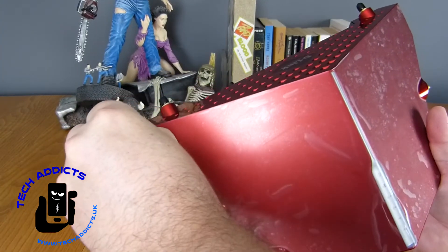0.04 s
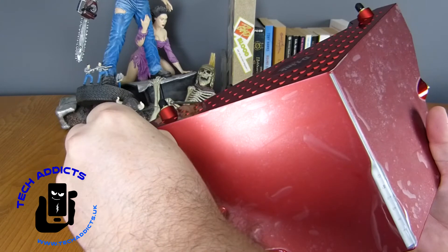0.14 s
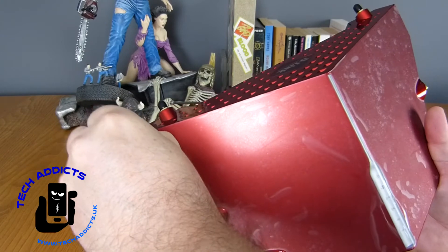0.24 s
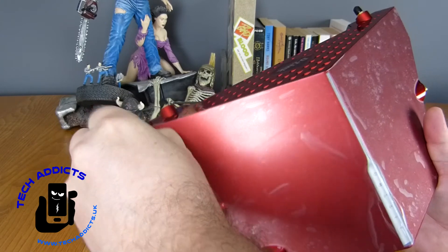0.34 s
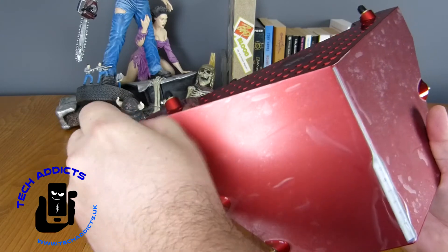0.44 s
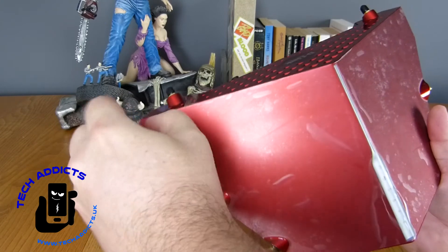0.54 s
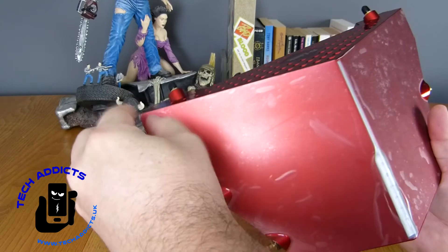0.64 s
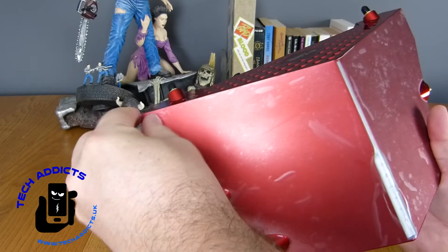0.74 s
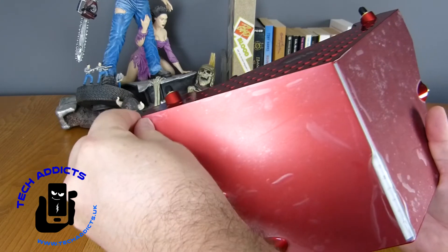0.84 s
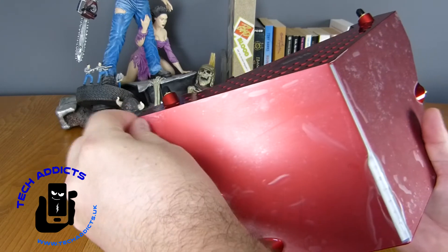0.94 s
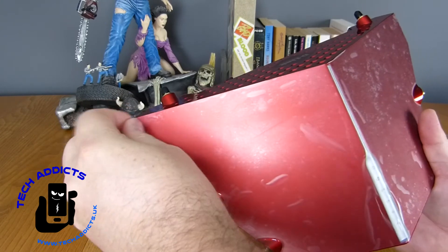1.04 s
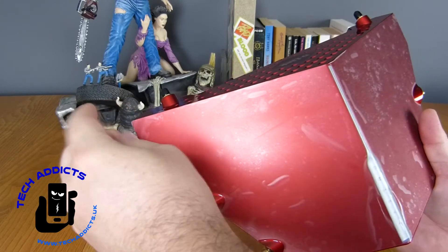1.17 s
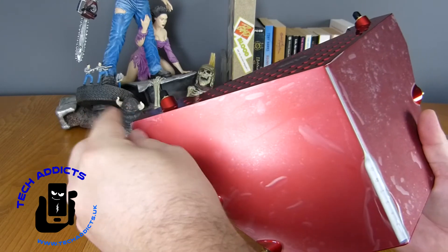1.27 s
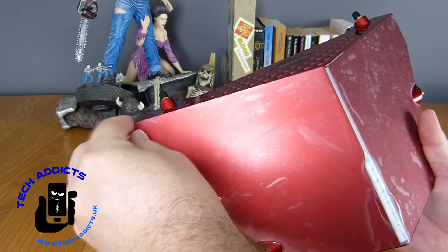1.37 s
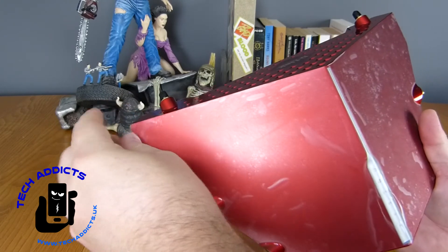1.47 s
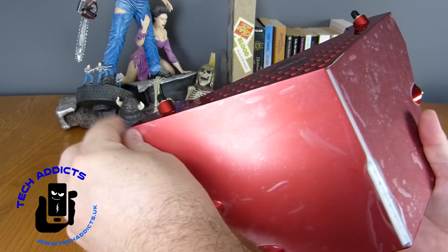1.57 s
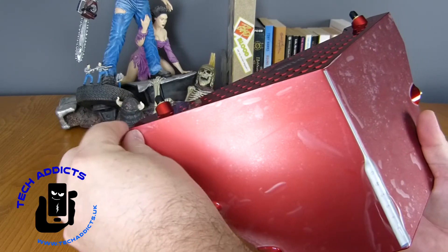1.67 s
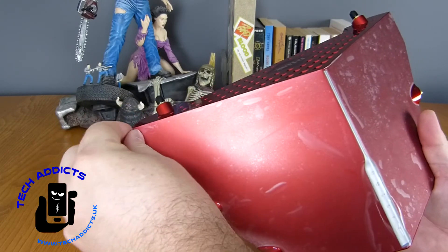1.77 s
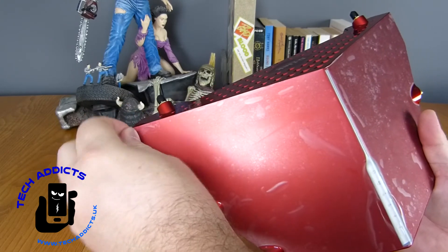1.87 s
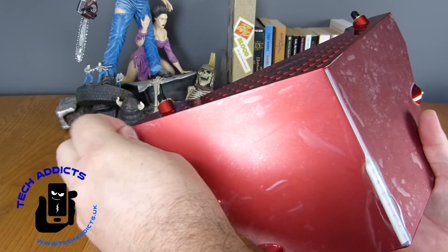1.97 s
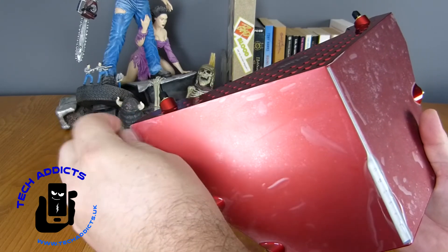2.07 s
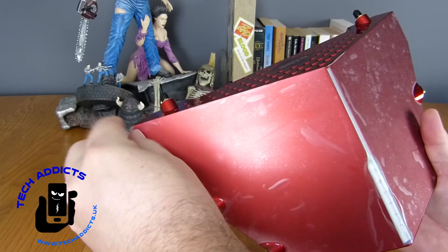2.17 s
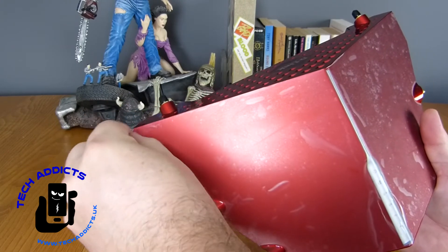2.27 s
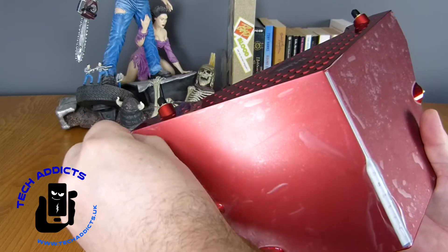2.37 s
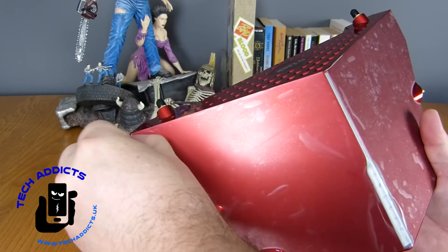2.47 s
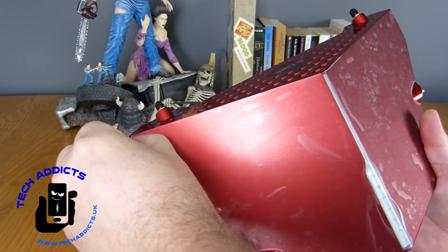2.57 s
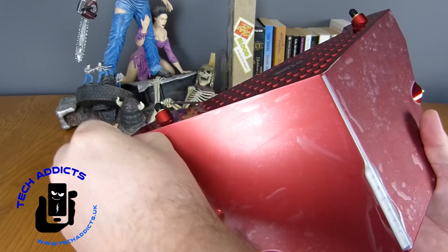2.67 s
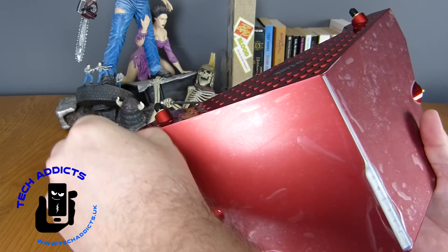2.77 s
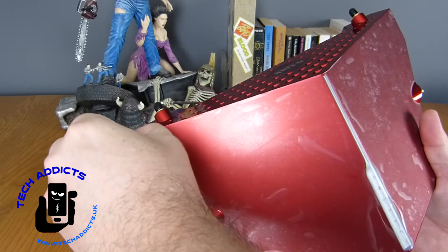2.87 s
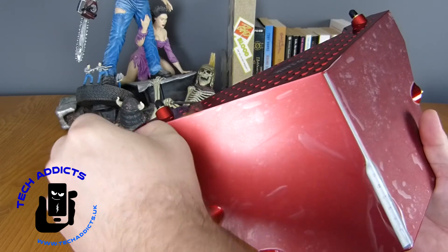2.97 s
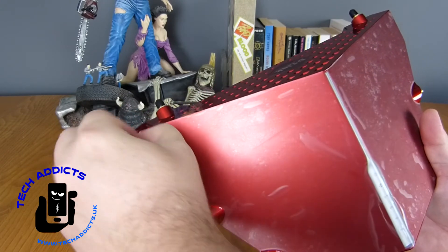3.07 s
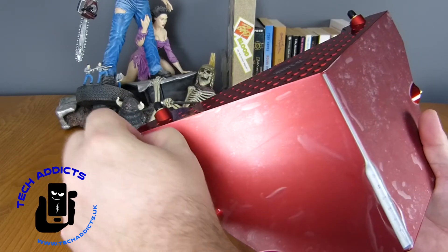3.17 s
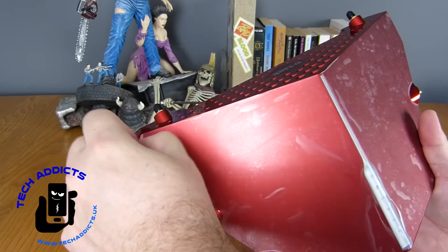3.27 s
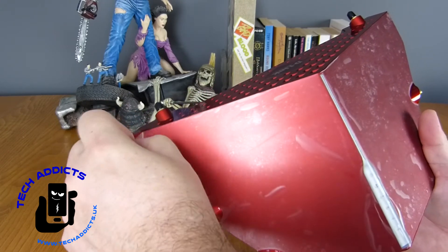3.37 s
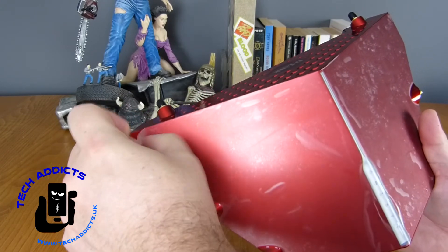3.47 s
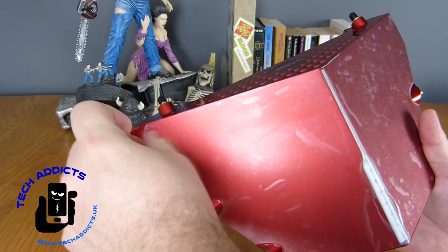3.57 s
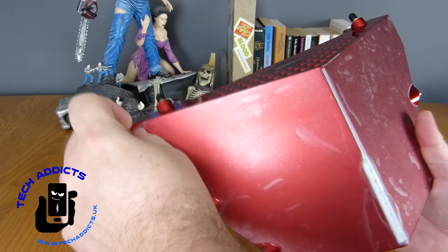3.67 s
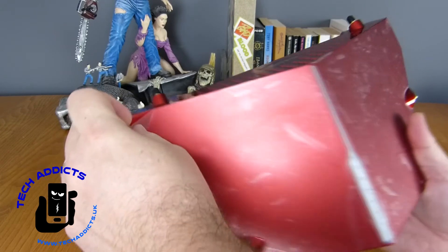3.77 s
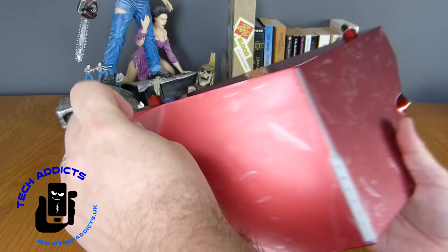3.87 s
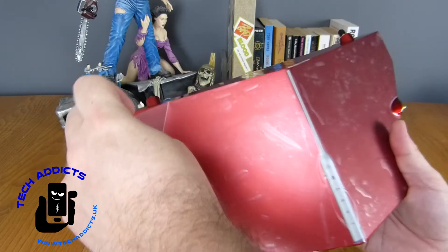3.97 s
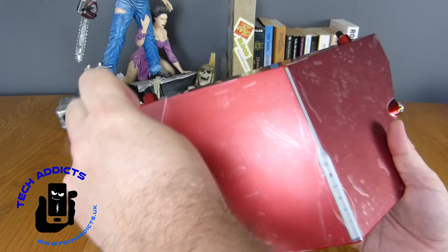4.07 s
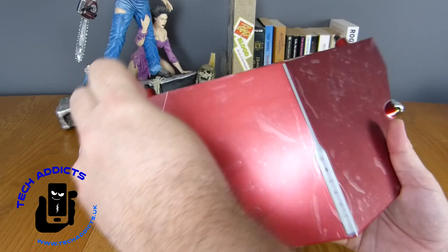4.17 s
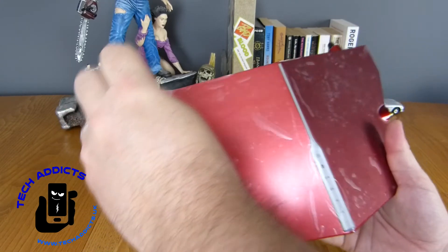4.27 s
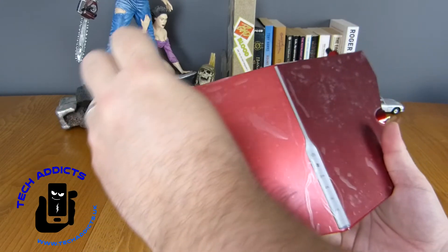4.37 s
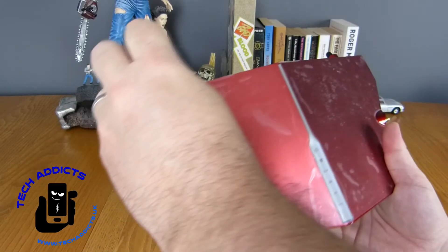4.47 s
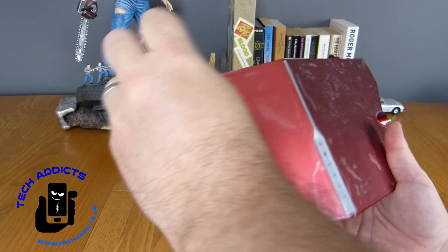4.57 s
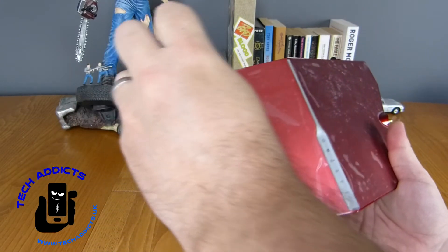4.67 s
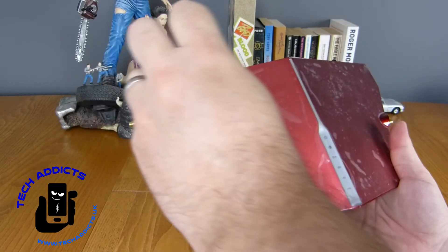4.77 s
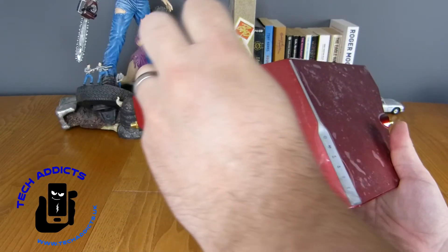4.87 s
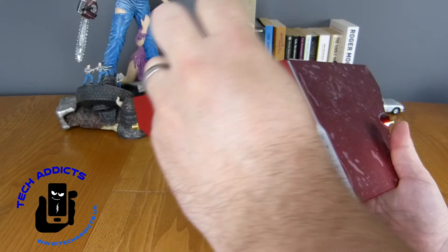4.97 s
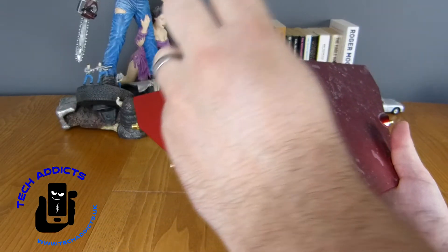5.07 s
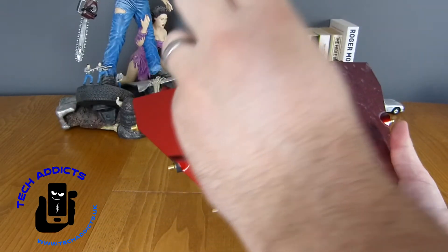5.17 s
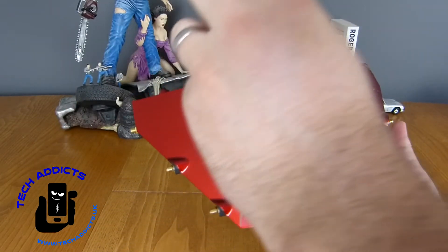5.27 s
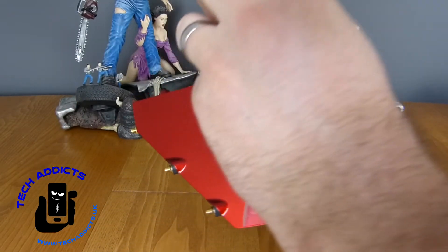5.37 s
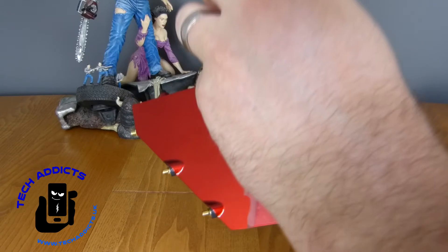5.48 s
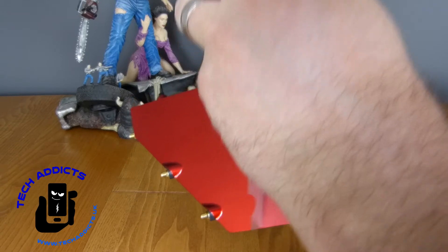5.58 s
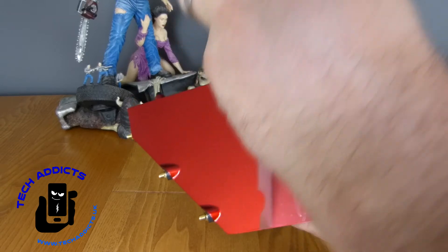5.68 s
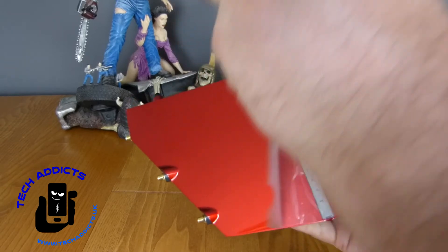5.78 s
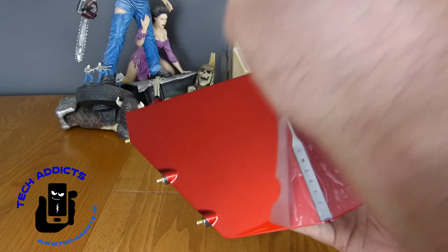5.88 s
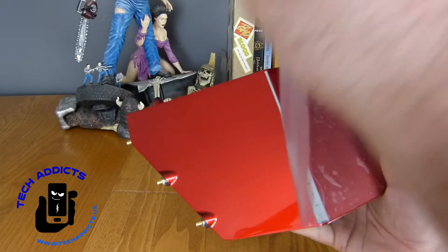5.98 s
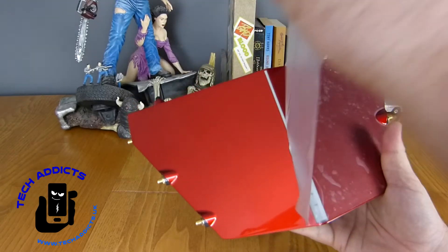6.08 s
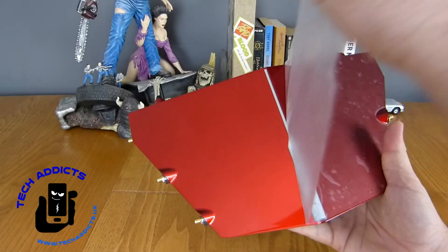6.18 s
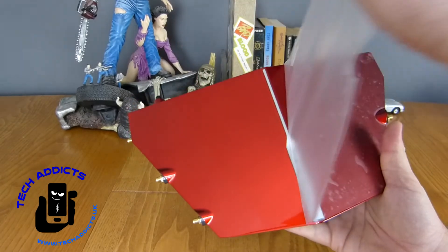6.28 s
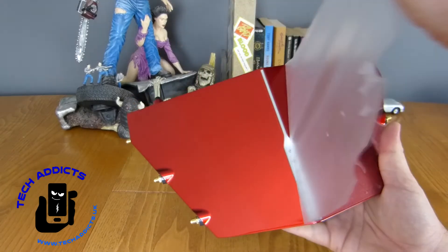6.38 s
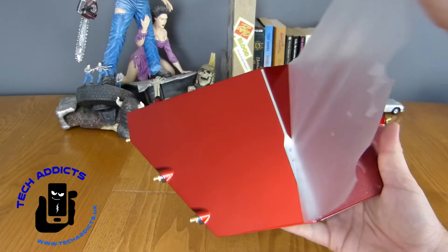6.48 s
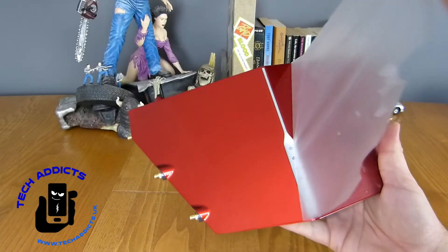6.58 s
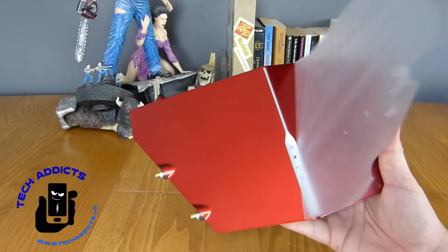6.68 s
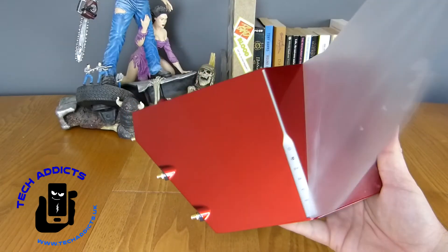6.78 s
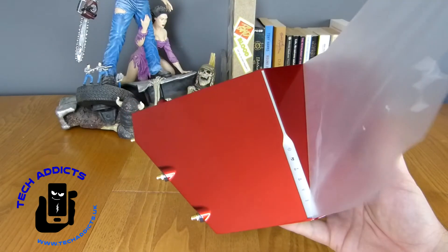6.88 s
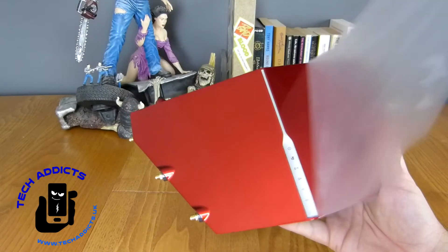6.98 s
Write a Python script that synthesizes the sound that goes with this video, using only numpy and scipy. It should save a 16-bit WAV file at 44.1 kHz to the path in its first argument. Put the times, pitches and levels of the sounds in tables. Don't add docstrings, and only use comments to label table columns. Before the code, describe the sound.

Quiet room hiss with sparse ticks and small film crackles, followed by a bright burst of jerky adhesive tearing from a resonant plastic box.

```python
import sys
import numpy as np
from scipy import signal
from scipy.fft import rfft, irfft, next_fast_len
from scipy.io import wavfile
from scipy.ndimage import uniform_filter1d, map_coordinates

SR = 44100
rng = np.random.default_rng(int(sys.argv[2]) if len(sys.argv) > 2 else 0)


def attenuation_scalar(level_db):
    decades = np.asarray(level_db, float) / 20
    return 10 ** decades


def unload_audio(sound):
    columns = np.transpose(np.atleast_2d(sound))
    steps = np.round(np.clip(columns, -1, 1) * 32767)
    wavfile.write(sys.argv[1], SR, steps.astype(np.int16))


N = 309840


def unit(x):
    return x / np.sqrt(np.mean(x ** 2) + 1e-20)


def along(points, hz):
    f, v = np.transpose(points)
    return np.interp(np.log(hz + 1), np.log(f + 1), v)


def hump(hz, centre_hz, width):
    return 1 / (1 + (np.log((hz + 1) / centre_hz) / width) ** 2)


def wobble(rate_hz):
    knots = rng.standard_normal(int(N * rate_hz / SR) + 4)
    return map_coordinates(knots, [np.arange(N) * rate_hz / SR])


def filtered(x, response):
    m = next_fast_len(x.shape[-1] + SR // 8)
    spectrum = rfft(x, m) * response(np.fft.rfftfreq(m, 1 / SR))
    return irfft(spectrum, m)[..., :x.shape[-1]]


def bent(x, gain_db, patchy_db):
    hz, t, z = signal.stft(x, SR, nperseg=512, noverlap=384)
    field = uniform_filter1d(rng.standard_normal(z.shape), size=2, axis=0)
    field = uniform_filter1d(field, size=50, axis=1)
    shape_db = gain_db(hz[:, None], np.minimum((t * SR).astype(int), N - 1))
    z = z * attenuation_scalar(shape_db + patchy_db * unit(field))
    return signal.istft(z, SR, nperseg=512, noverlap=384)[1][:N]


# freq_hz, level_db_per_hz
HISS = [(20, -30), (45, -3.5), (120, -5.5), (170, -5.5), (370, -10), (450, -12), (490, -11), (650, -15),
        (700, -14), (3000, -25.5), (9000, -32), (14500, -33), (16000, -48)]
# freq_hz, side_minus_mid_db
HISS_SIDE = [(60, -35), (110, -28), (200, -28), (380, -24), (700, -20.5), (1290, -18), (2380, -13.5),
             (4400, -11), (8120, -9.5), (15000, -12)]


def hiss():
    level_db = -57.5 + 0.39 * wobble(3.13)
    mid = filtered(rng.standard_normal(N), lambda hz: attenuation_scalar(along(HISS, hz)))
    side = filtered(rng.standard_normal(N), lambda hz: attenuation_scalar(along(HISS, hz) + along(HISS_SIDE, hz)))
    return attenuation_scalar(level_db) * np.array([mid + side, mid - side]) / np.std(mid)


def flutter(x):
    hz, t, z = signal.stft(x, SR, nperseg=1024)
    strips = rng.random((len(hz) // 6 + 1, len(t) // 2 + 1))
    strips = np.repeat(np.repeat(strips, 6, axis=0), 2, axis=1)
    lost = np.clip((hz[:, None] - 12300) / 4600, 0, .8)
    keep = strips[:len(hz), :len(t)] > lost
    return signal.istft(z * keep / np.sqrt(1 - lost), SR, nperseg=1024)[1][..., :N]


def shake():
    level_db = -65 + 4.5 * np.tanh(wobble(3.5))
    return attenuation_scalar(level_db) * unit(filtered(rng.standard_normal(N), lambda hz: hump(hz, 25.4, .3) ** 2))


def ruptures(spread_db, clump_db):
    size_db = spread_db * rng.uniform(-1.24, 1, N) + clump_db * np.tanh(wobble(110) + wobble(500))
    return unit(rng.standard_normal(N) * attenuation_scalar(size_db))


def curves(tables):
    s, *cols = np.transpose(np.vstack(tables))
    t = np.arange(N) / SR
    on = sum((t >= rows[0][0]) & (t < rows[-1][0]) for rows in tables) > 0
    level_db, *rest = [np.interp(t, s, c) for c in cols]
    return [attenuation_scalar(level_db) * uniform_filter1d(on * 1., size=90), *rest]


# time_s, tearing_db, flap_hz
LIFTS = [
    [(.42, -70, 3700), (.428, -44, 3620), (.445, -40.5, 3100), (.47, -38.5, 2140), (.495, -41.5, 1500),
     (.53, -42.5, 1220), (.549, -33.5, 1400), (.565, -46, 1450), (.6, -57, 2200)],
    [(1.066, -70, 6500), (1.074, -56, 6000), (1.086, -50, 2400), (1.1, -52, 1900), (1.125, -69, 2200)],
    [(3.002, -62, 5500), (3.018, -42, 4300), (3.04, -42, 3180), (3.06, -45, 2800), (3.076, -52, 2600),
     (3.095, -41.5, 2290), (3.11, -41, 1810), (3.13, -46, 1830), (3.145, -59, 1840)],
]
# freq_hz, level_db_per_hz
FILM = [(400, -45), (700, -29), (1200, -9), (2250, -8), (3300, -1.5), (4500, 1), (5800, -0.5), (9000, -3.5),
        (12700, -3.5), (14500, -4), (15800, -9)]
# freq_hz, level_db_per_hz
DRUM = [(250, -31), (500, -6), (800, 0.5), (1200, 1.5), (2000, 0.5), (2600, -4.5), (3400, -11.5),
        (5700, -120)]


def lifts():
    short_flap_hz, upper_mode_hz, upper_follows = 4500, 6400, .15
    gain, flap_hz = curves(LIFTS)
    longer_oct = np.maximum(np.log2(short_flap_hz / flap_hz), 0)
    ring_db = 9.5 * longer_oct
    upper_hz = upper_mode_hz * (flap_hz / short_flap_hz) ** upper_follows
    drum_db = -21.5 + 6 * longer_oct
    tilt_db = 5.5 - 2.8 * longer_oct
    busy = round((LIFTS[-1][-1][0] + .1) * SR)
    breaks = ruptures(spread_db=6, clump_db=2.5)[:busy]
    tear, drum = map(unit, filtered(breaks, lambda hz: attenuation_scalar([along(FILM, hz), along(DRUM, hz)])))
    flap_hz = flap_hz * (1 + .035 * wobble(120))

    def flap(hz, at):
        first = 1.3 * ring_db[at] * hump(hz, flap_hz[at], .1)
        second = 4.5 * hump(hz, upper_hz[at], .06)
        below = np.clip(30 * np.log((hz + 1) / flap_hz[at]), -8, 0)
        return first + second + below + tilt_db[at] * np.log2(hz / 6000 + 0.11)

    sound = bent(tear, flap, patchy_db=2.5)[:busy] + attenuation_scalar(drum_db[:busy] + 3.0) * drum
    return gain * attenuation_scalar(-2.0) * np.pad(sound, (0, N - busy))


# time_s, peak_db, centre_hz, knock_db, knock_hz
TICKS = [(0.9703, -36, 4000, -7, 1250), (1.0685, -46, 11000, -25, 1500), (1.569, -53, 3100, -2, 1240),
         (2.011, -50, 4480, -16, 886), (3.2117, -34, 7800, -13, 1320), (3.3053, -36, 8500, -10, 1290),
         (3.5543, -43, 12000, -11, 1730), (3.5612, -37.5, 3400, -6.5, 1580),
         (3.705, -33.5, 3900, -3.5, 1310), (3.7717, -32, 7600, -17, 972), (6.3046, -44.5, 2850, -13, 630),
         (6.754, -31.5, 8300, -23, 1600)]
# time_s, peak_db, centre_hz
JUMPS = [(.4269, -29, 6400), (0.4337, -32, 5700), (.4384, -30, 6360), (3.02, -30, 6500),
         (3.8684, -27, 10100), (3.8836, -19, 11400), (4.3036, -45, 12700), (4.3231, -43, 10000),
         (4.349, -29.5, 6980), (4.37, -24, 6010), (4.3864, -37, 4640), (4.6317, -36, 4452),
         (4.6843, -29, 5170), (4.7623, -14, 4540), (5.1914, -28.5, 6560), (5.6653, -22, 4860),
         (5.7927, -22.5, 11000), (5.92, -21, 6220), (6.0736, -17, 6830), (6.123, -20, 4920),
         (6.398, -46, 11500), (6.4286, -39, 12900), (6.464, -34, 10200), (6.4894, -33, 12500),
         (6.5447, -34.5, 10300), (6.6049, -46, 11300), (6.6245, -36, 7380), (6.8219, -37, 11300),
         (6.8489, -33, 4780), (6.8686, -14, 12500)]


def snaps():
    tick_t60_s, tick_dull_db_per_oct = 0.075, -4
    jump_t60_s, jump_dull_db_per_oct, jump_knock_db, jump_knock_hz = 0.057, -.7, -19.5, 1400
    out, t = np.zeros(N + SR), np.arange(SR // 8) / SR
    hz = np.fft.rfftfreq(len(t), 1 / SR)
    ticks = [(*row, tick_t60_s, tick_dull_db_per_oct) for row in TICKS]
    jumps = [(*row, jump_knock_db, jump_knock_hz, jump_t60_s, jump_dull_db_per_oct) for row in JUMPS]
    for s, db, centre_hz, knock_db, knock_hz, t60_s, dull_db in ticks + jumps:
        burst = rng.standard_normal((2, len(t)))
        dulling_db = dull_db * np.log2(np.maximum(hz / centre_hz, 1))
        bright = attenuation_scalar(along(FILM, hz) + 9.5 * hump(hz, centre_hz, 0.29) + dulling_db)
        snap = unit(irfft(rfft(burst[0]) * bright, len(t)))
        knock = unit(irfft(rfft(burst[1]) * hump(hz, knock_hz, 0.33), len(t)))
        knock *= attenuation_scalar(knock_db + 3)
        fade = attenuation_scalar(-60 * t / max(t60_s, .005)) * (1 - np.exp(-t / .0003))
        crack = 1 + 1.2 * attenuation_scalar(-60 * t / .012)
        out[round(s * SR):][:len(t)] += attenuation_scalar(db - 10.5) * fade * (crack * snap + knock)
    return out[:N]


# freq_hz, width_hz, lift_db
WALLS = [(683, 68, 9.5), (1020, 42, 5), (1366, 92, 2), (1720, 56, 0), (2050, 150, 2.5), (2340, 81, 2),
         (3380, 61, 2.5), (3900, 91, 0), (4230, 230, -1), (4900, 120, -0.5), (5520, 140, -2.5),
         (6200, 160, 0), (7300, 130, -0.5)]


def walls(hz):
    lift_db = sum(db / (1 + ((hz - c) / (w / 2)) ** 2) for c, w, db in WALLS)
    lift = np.log(attenuation_scalar(lift_db))
    mirrored = np.r_[lift, lift[-2:0:-1]]
    return np.exp(np.conj(signal.hilbert(mirrored))[:len(hz)])


# freq_hz, t60_s
ROOM = [(300, 0.26), (2000, 0.2), (12000, 0.18)]


def room(x):
    hz, t, z = signal.stft(rng.standard_normal(SR // 2), SR, nperseg=256)
    decay = attenuation_scalar(-60 * t / along(ROOM, hz)[:, None])
    tail = signal.istft(z * decay, SR, nperseg=256)[1]
    return signal.fftconvolve(np.pad(x, (200, 0)), tail / np.linalg.norm(tail))[:N]


# time_s, level_db, mode_hz, t60_s
BUMPS = [
    (1.87, -51.5, 690, .12),
    (3.112, -51, 1860, .2),
    (3.305, -48, 1330, .06),
    (3.707, -40.5, 270, 0.076),
]


def bumps():
    out, t = np.zeros(N), np.arange(SR // 5) / SR
    for s, db, hz, t60_s in BUMPS:
        envelope = attenuation_scalar(db - 60 * t / t60_s) * (1 - np.exp(-t / 0.0013))
        out[round(s * SR):][:len(t)] += envelope * np.sin(2 * np.pi * hz * t)
    return out


# start_s, crest_s, let_go_s, crest_db, let_go_db
PULLS = [(3.87, 3.88, 3.93, -38, -32.5), (3.225, 3.25, 3.28, -64, -67), (3.715, 3.745, 3.8, -63, -64),
         (3.904, 3.974, 4.095, -27.5, -30.5), (4.298, 4.325, 4.34, -57, -58),
         (4.335, 4.365, 4.375, -49, -47), (4.372, 4.44, 4.527, -28.5, -27.5),
         (4.61, 4.628, 4.75, -55.5, -55), (4.674, 4.76, 4.77, -36.5, -36), (4.74, 4.79, 4.9, -33, -46.5),
         (4.895, 4.93, 4.962, -50.5, -53), (4.974, 5.075, 5.135, -34, -41.5),
         (5.13, 5.152, 5.232, -50, -54), (5.236, 5.262, 5.3, -38.5, -38), (5.26, 5.33, 5.467, -34.5, -42.5),
         (5.475, 5.512, 5.53, -40, -41), (5.5, 5.6, 5.715, -32, -45.5), (5.712, 5.76, 5.89, -41, -40.5),
         (5.877, 5.94, 5.975, -33, -39.5), (5.999, 6.083, 6.217, -30.5, -38),
         (6.405, 6.466, 6.55, -51, -58), (6.624, 6.642, 6.662, -47, -50), (6.795, 6.82, 6.848, -59, -61),
         (6.856, 6.874, 6.904, -30, -25.5), (6.895, 6.925, 6.954, -27, -30.5)]


def effort():
    rise_db, rise_shape, sag_shape = 14, 1.17, 1.47
    catch_db_per_s, drop_db_per_s = 1500, 702
    creep_db, creep_db_per_s = -11, 246
    start, crest, end, crest_db, end_db = np.transpose(PULLS)[..., None]
    t = np.arange(0, N, 44) / SR
    climb = rise_db * np.clip((crest - t) / (crest - start), 0, 1) ** rise_shape
    sag = (crest_db - end_db) * np.clip((t - crest) / (end - crest), 0, 1) ** sag_shape
    after_s = np.maximum(t - end, 0)
    release = np.minimum(drop_db_per_s * after_s, creep_db_per_s * after_s - creep_db)
    tugs = crest_db - climb - sag - release - catch_db_per_s * np.maximum(start - t, 0)
    leader = tugs.argmax(axis=0)[None]
    leading = lambda c: np.clip(np.take_along_axis(c, leader, axis=0)[0], 0, 1)
    slow = (tugs.max(axis=0), leading(release / -creep_db), leading(climb / rise_db))
    return [np.interp(np.arange(N) / SR, t, c) for c in slow]


# from_s, wall_mode_hz, sheet_mode_hz, drum_db, hand_rumble_db
SPOTS = [(3.8, 5800, 4600, -23, -25), (3.91, 1000, 4450, -11.5, -29), (4.03, 1040, 3380, -13.5, -26.5),
         (4.25, 1030, 4760, -10.5, -26), (4.62, 1000, 4600, -14, -19), (4.755, 560, 4500, -11, -16),
         (4.96, 437, 3720, -13, -17), (5.23, 690, 4900, -12.5, -20.5), (5.49, 725, 4730, -12.5, -19),
         (5.73, 2400, 5560, -14, -22), (5.91, 2400, 6200, -19, -26), (5.99, 3100, 6500, -15, -27),
         (6.35, 1380, 5260, -7, -26), (6.79, 960, 5600, -12, -20)]
# freq_hz, level_db_per_hz
RUMBLE = [(100, -53), (200, -2), (350, -2), (520, -6), (900, -50)]


def pulls():
    usual_db, early_drum_db = -35, -5
    drum_per_db, rumble_per_db, crisp_per_db, crackle_per_db = -0.08, -0.64, -0.24, .22
    crisp_edge_db, limp_db = 0.5, -10
    young_db, young_hz, grows_s = -8, 2100, .2
    level_db, slack, early = effort()
    harder_db = np.clip(level_db - usual_db, -30, 10)
    since_s, *spots_hz, held_db, hand_db = np.transpose(SPOTS)
    spot = lambda at: np.maximum(np.searchsorted(since_s, at / SR) - 1, 0)
    here = spot(np.arange(N))
    drum_db = held_db[here] + drum_per_db * harder_db + early_drum_db * early
    rumble_db = hand_db[here] + rumble_per_db * harder_db
    crisp_db = crisp_edge_db + crisp_per_db * harder_db * (1 - slack) + limp_db * slack
    clumps = np.tanh(1.5 * wobble(130)) - .3
    coarse_db = crackle_per_db * np.maximum(-harder_db, 0) * (1 - slack) * clumps

    def parts(hz):
        edge = 1 / (1 + (8500 / (hz + 1)) ** 8)
        sheet = attenuation_scalar(along(FILM, hz)) * np.sqrt([1 - edge, edge])
        return [*sheet, attenuation_scalar(along(DRUM, hz)), attenuation_scalar(along(RUMBLE, hz))]

    def modes(hz, at):
        peaks = sum(4.2 / (1 + ((hz - c[spot(at)]) / 70) ** 2) for c in spots_hz)
        young = young_db * np.exp(-np.maximum(at / SR - PULLS[0][0], 0) / grows_s)
        return peaks - 1.2 + young * hump(hz, young_hz, .25)

    film, crisp, drum, rumble = map(unit, filtered(ruptures(spread_db=6, clump_db=1.1), parts))
    whole = film + attenuation_scalar(crisp_db) * crisp + attenuation_scalar(drum_db) * drum + attenuation_scalar(rumble_db) * rumble
    return attenuation_scalar(level_db) * attenuation_scalar(coarse_db) * bent(whole, modes, patchy_db=2.5)


# start_s, end_s, low_hz, high_hz, level_db
FILLS = [
    (3.948, 3.99, 6900, 8950, -39),
    (4.486, 4.525, 5180, 6300, -38),
    (4.488, 4.525, 7500, 8920, -38),
]


def fills():
    side = np.zeros(N)
    for start_s, end_s, lo_hz, hi_hz, db in FILLS:
        length = round((end_s - start_s) * SR)
        band = unit(filtered(rng.standard_normal(SR // 10), lambda hz: (hz > lo_hz) & (hz < hi_hz)))
        side[round(start_s * SR):][:length] += attenuation_scalar(db) * band[:length] * np.sqrt(np.hanning(length))
    return np.array([side, -side])


def scene():
    film = filtered(lifts() + pulls() + snaps(), walls) + bumps()
    return attenuation_scalar(-2.5) * film + attenuation_scalar(-11.5) * room(film) + flutter(hiss()) + shake()


def top_cut(x):
    return signal.sosfilt(signal.butter(12, 16500, fs=SR, output="sos"), x)


def record(dry):
    top_hz = 15830
    mix = filtered(dry + fills(), lambda hz: hz < top_hz)
    return top_cut(mix)


dry = scene()
out = record(dry)
unload_audio(out)
```